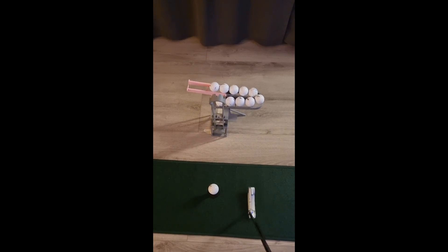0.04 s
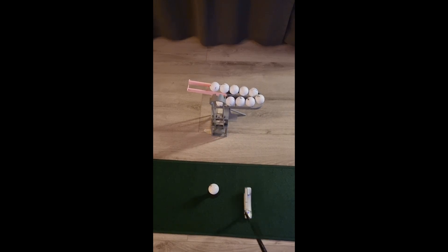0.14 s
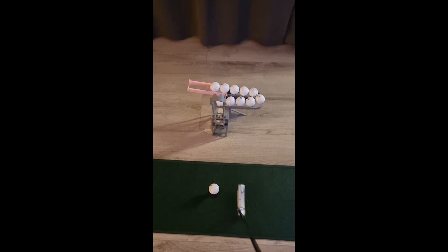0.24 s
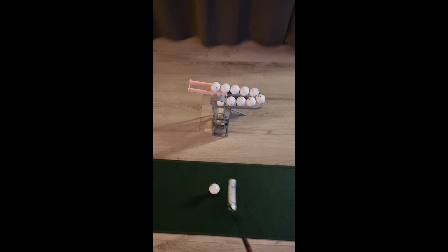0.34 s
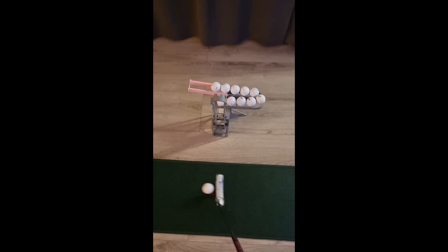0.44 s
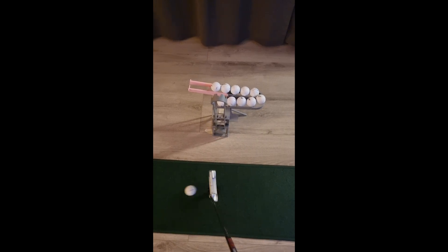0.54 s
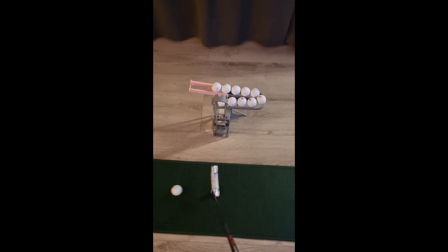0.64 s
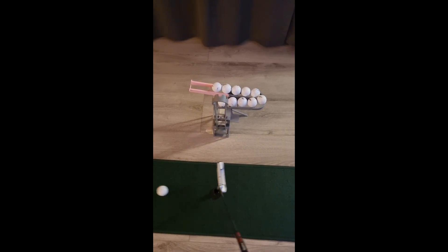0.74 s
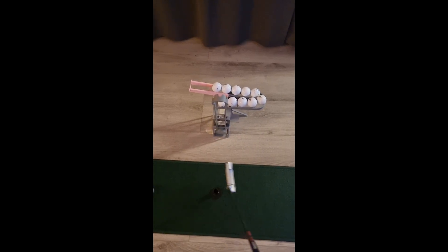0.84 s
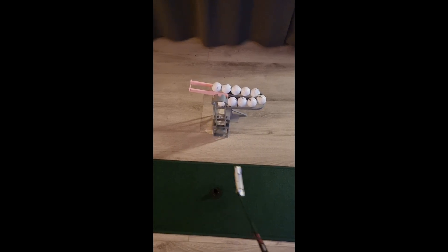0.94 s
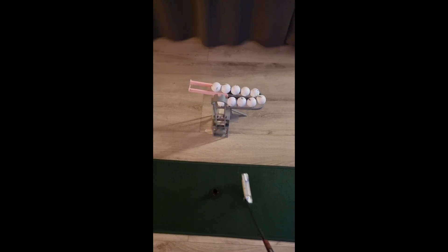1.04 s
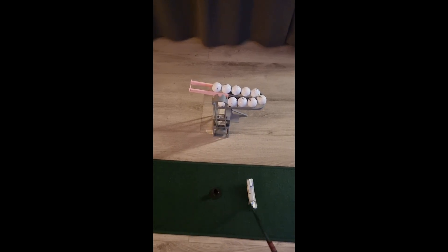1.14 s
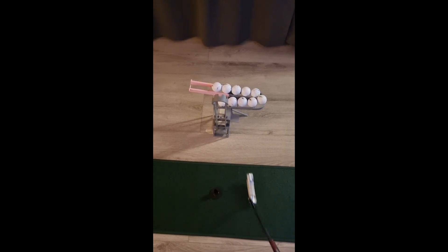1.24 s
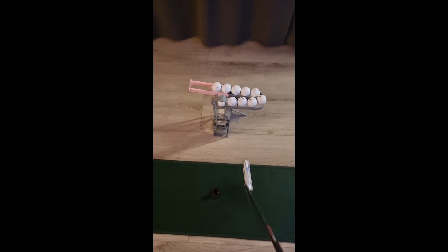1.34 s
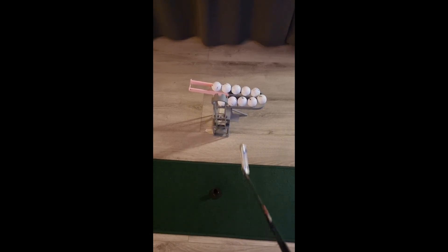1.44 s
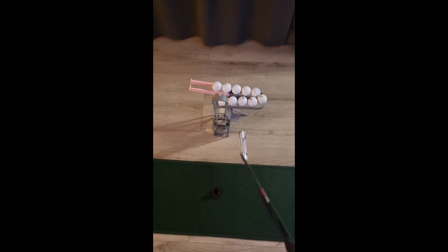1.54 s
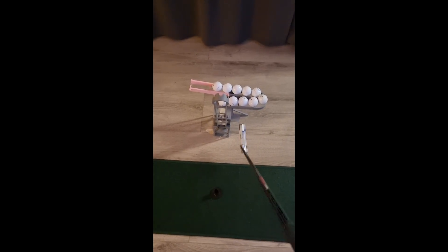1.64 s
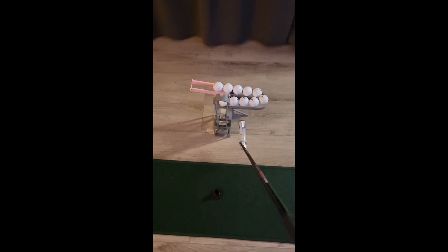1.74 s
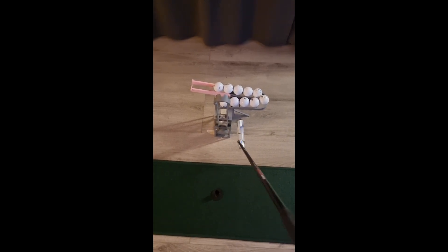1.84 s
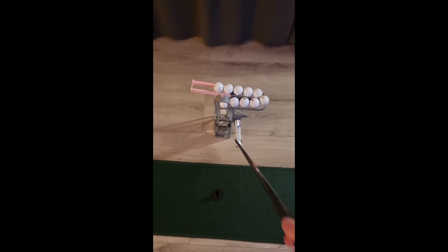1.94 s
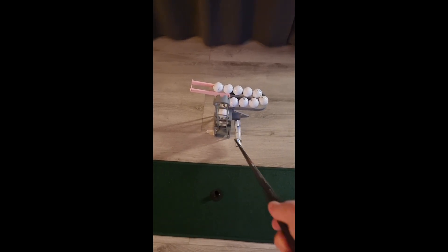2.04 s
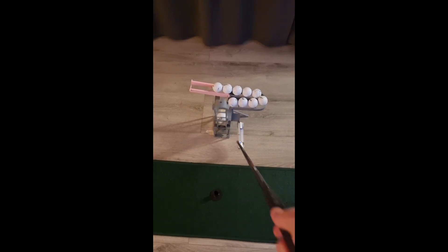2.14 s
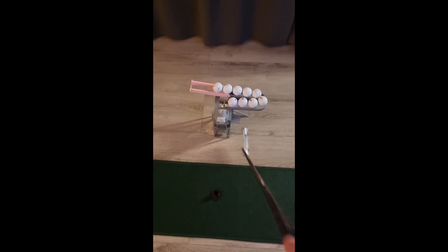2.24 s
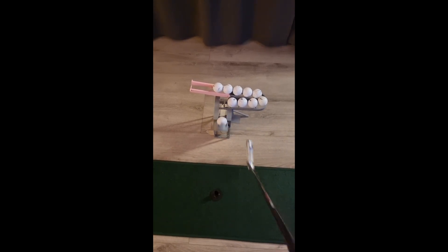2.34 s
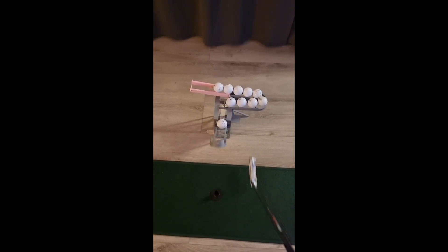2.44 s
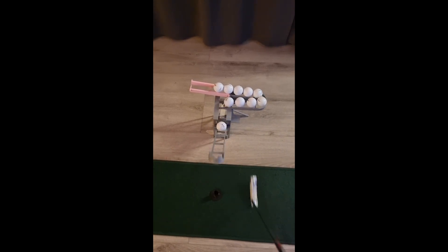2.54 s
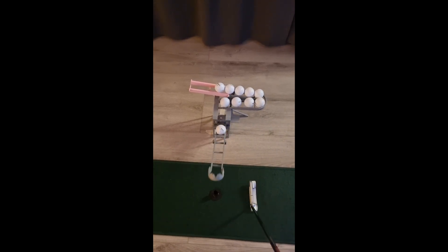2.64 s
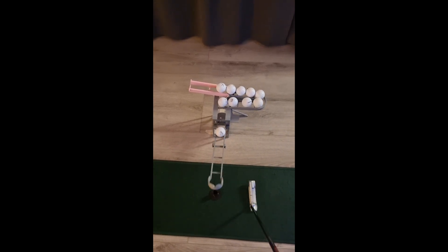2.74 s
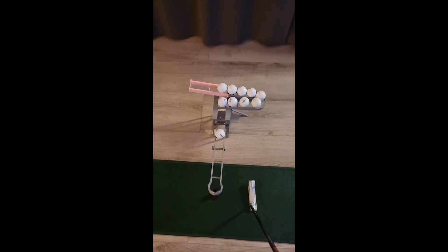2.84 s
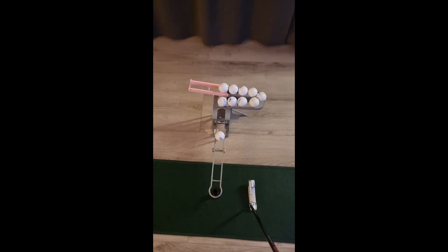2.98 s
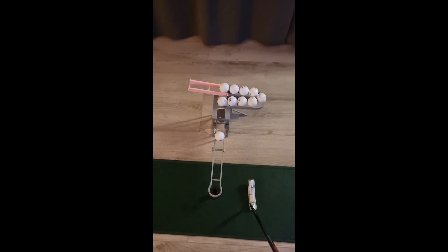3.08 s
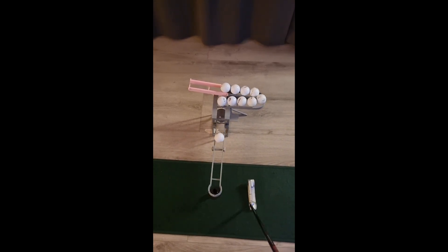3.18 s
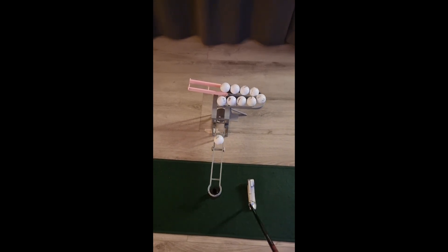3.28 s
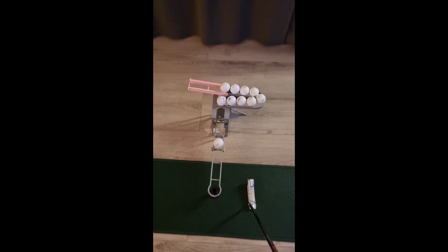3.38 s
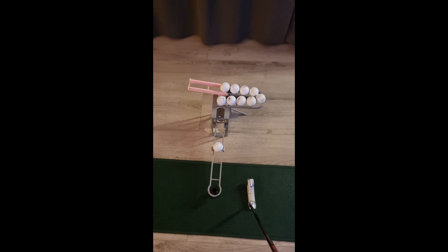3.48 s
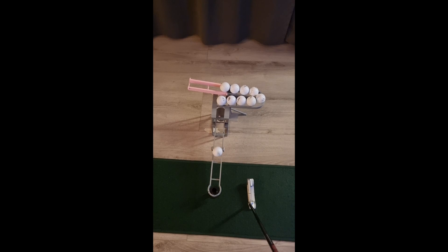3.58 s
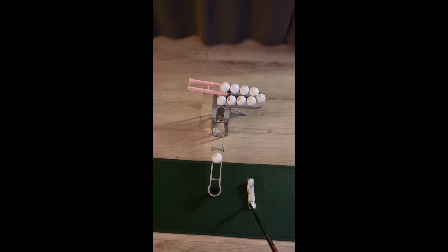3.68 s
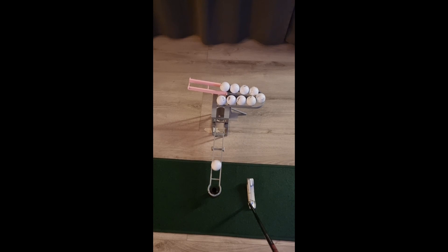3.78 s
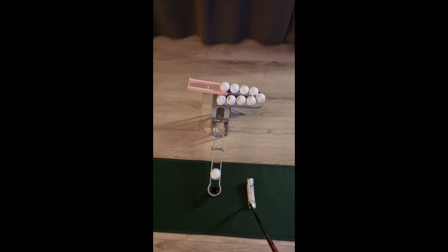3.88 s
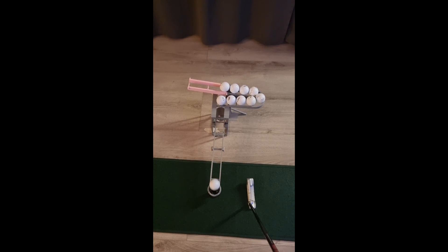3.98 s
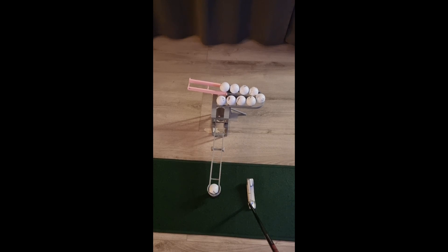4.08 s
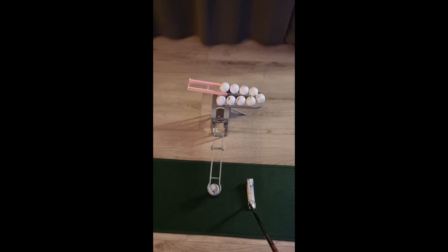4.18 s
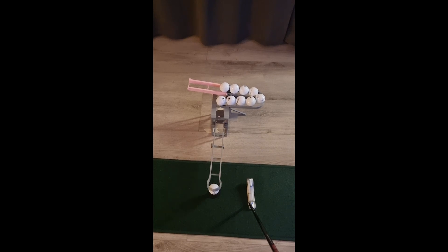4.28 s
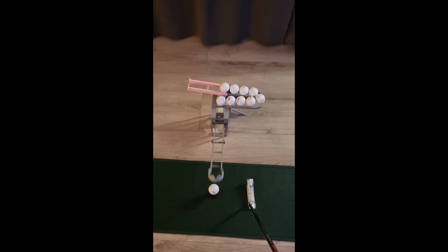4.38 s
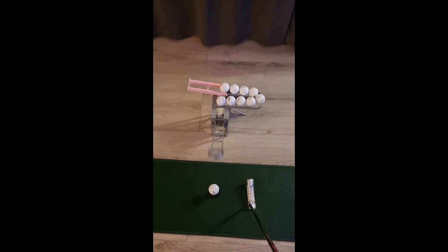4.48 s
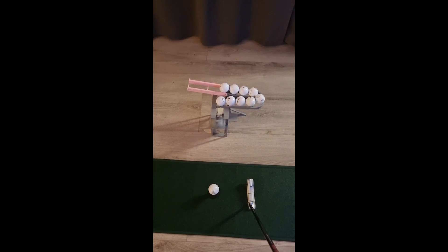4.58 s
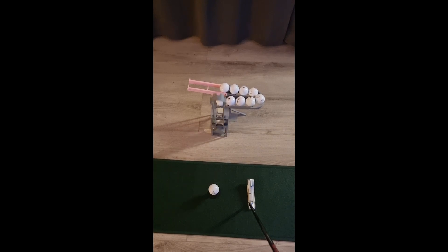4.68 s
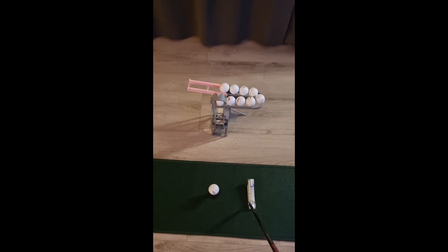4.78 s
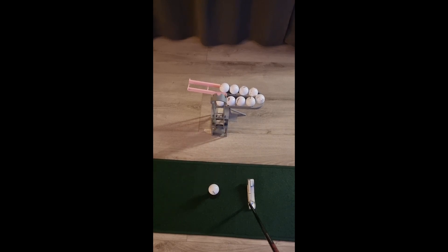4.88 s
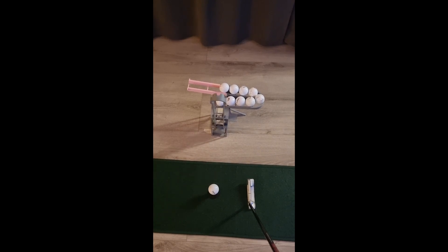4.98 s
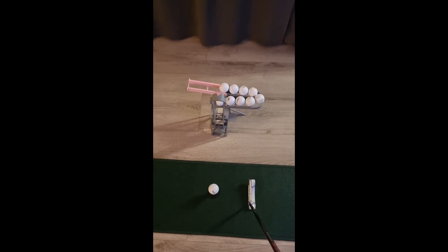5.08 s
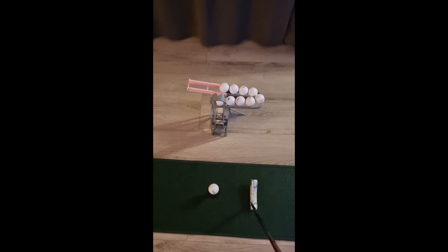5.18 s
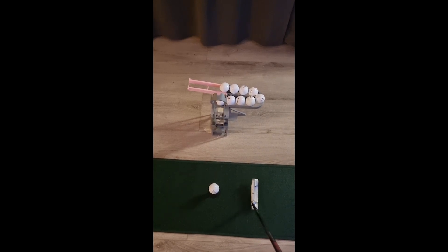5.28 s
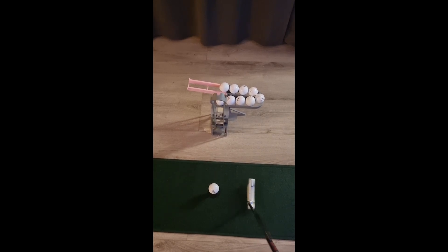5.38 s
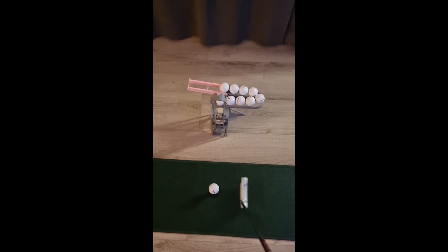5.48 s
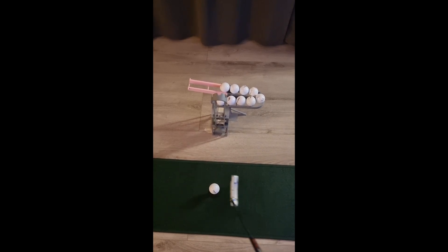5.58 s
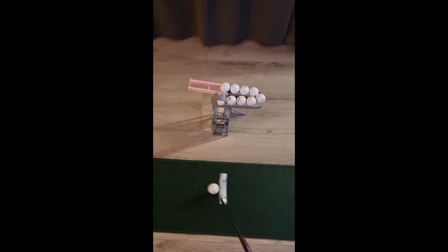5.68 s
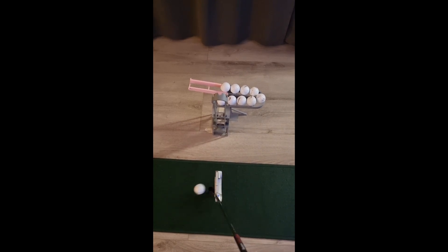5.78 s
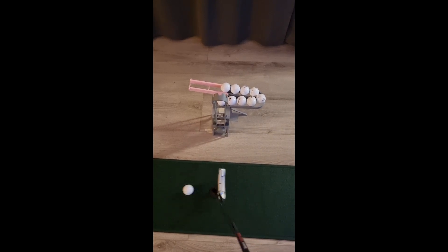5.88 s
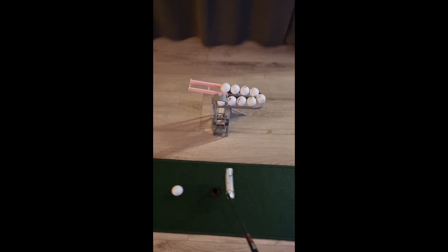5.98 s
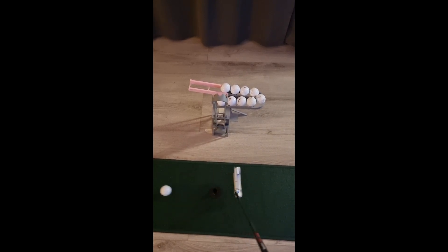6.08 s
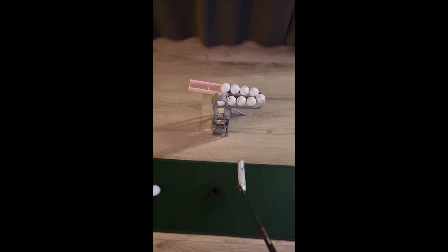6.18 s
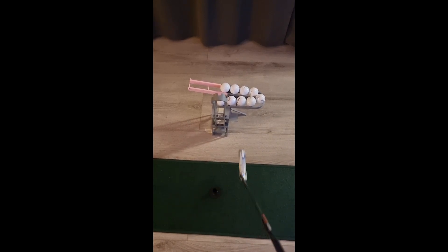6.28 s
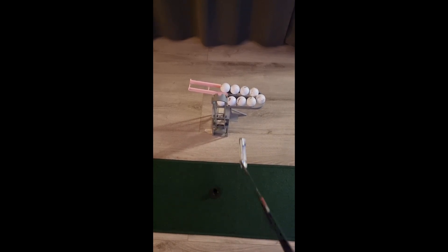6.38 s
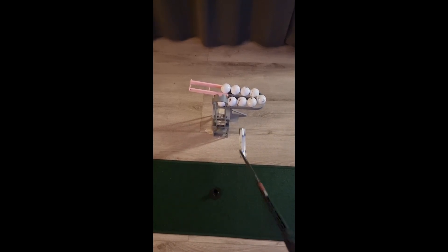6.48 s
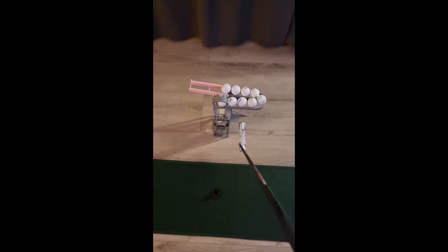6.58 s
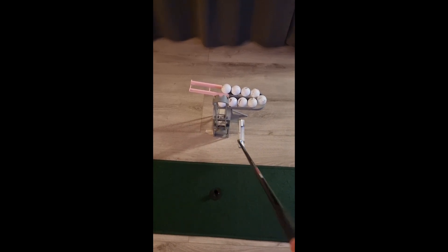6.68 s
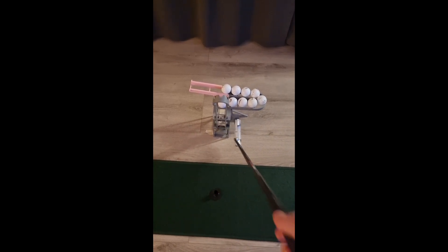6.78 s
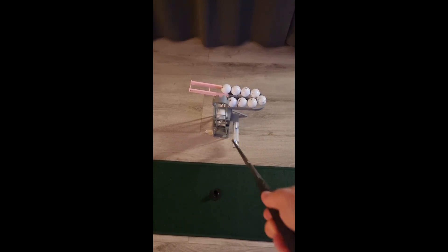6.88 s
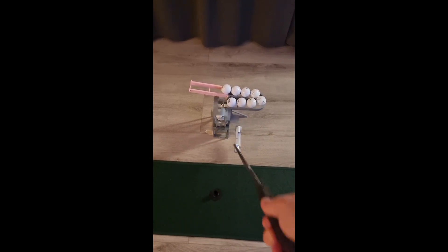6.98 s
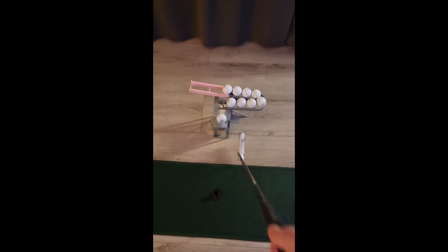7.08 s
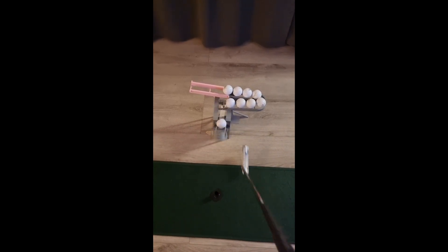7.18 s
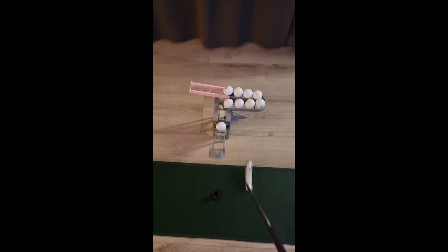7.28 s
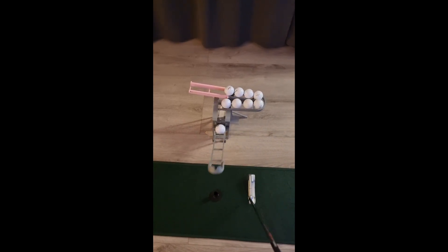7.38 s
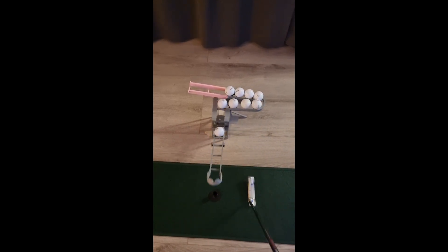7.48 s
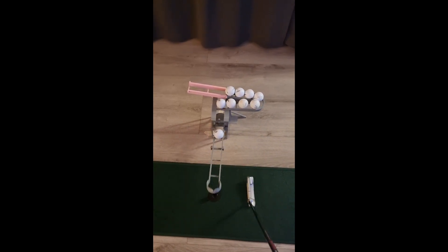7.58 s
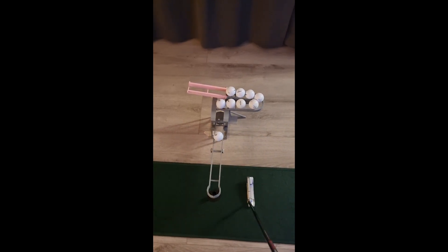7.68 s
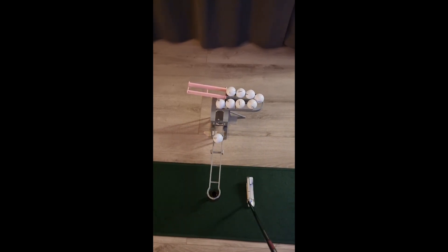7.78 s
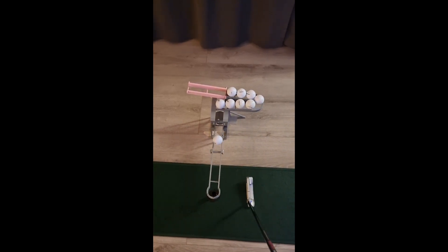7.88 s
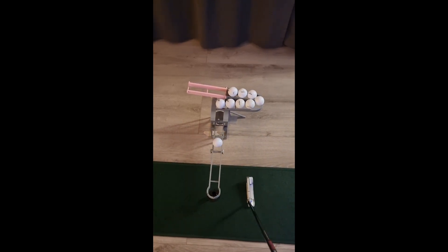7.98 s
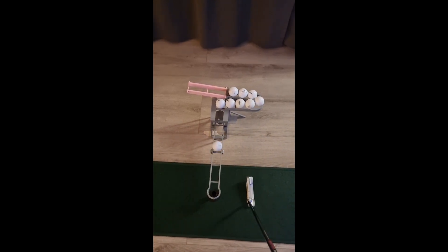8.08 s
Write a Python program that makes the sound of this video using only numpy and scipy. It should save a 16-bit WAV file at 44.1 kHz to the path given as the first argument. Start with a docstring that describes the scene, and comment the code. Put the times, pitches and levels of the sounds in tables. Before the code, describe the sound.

A light putt and a hollow thump on a matted wooden floor open the scene, heard from close by in a small room. A plastic golf ball dispenser clicks, squeaks faintly and drops a ball with a sharp clack. Its arm lands, the ball rolls and rattles off, and the arm snaps back. After another putt and thump, the dispenser clacks again, its arm lowers and the waiting balls click quietly together.

```python
"""Two putts and a ball dispenser

A putter tocks against a ball, which lands on a mat and sets the low modes of a wooden floor booming.
After each putt the putter taps a dispenser's pedal and a ball drops in the plastic housing. The first
time, a rail arm swings down, a ball rolls along it and the arm clatters back up; the second time, the
arm swings down and the waiting balls shuffle. Impacts excite damped modes, rubbing and rolling are
trains of tiny impacts, and a small, fairly live room reverberates over the murmur of its air."""
import sys
import numpy as np
from scipy import signal
from scipy.fft import rfft, irfft
from scipy.io import wavfile
from scipy.ndimage import uniform_filter1d

SR = 44100
rng = np.random.default_rng(int(sys.argv[2]) if len(sys.argv) > 2 else 0)


def wav_out(sig):
    """Save sig, one row per channel (or a flat mono array), as 16-bit PCM at SR to the path in sys.argv[1]."""
    wavfile.write(sys.argv[1], SR, np.round(np.clip(np.atleast_2d(sig).T, -1, 1) * 32767).astype(np.int16))


N = 358533

# putter on ball; an off-centre stroke rings more: t/s, level/dB, ring/dB
PUTTS = [(.486, -39, 9.5), (5.7719, -37, -2)]
# putted ball on the mat: t/s, level/dB, hop time/s, loss per hop/dB
BALL_LANDINGS = [(.621, -25, .112, 8), (5.908, -24.5, .106, 12)]
# putter on pedal: t/s, level/dB
PEDAL_TAPS = [(1.9621, -34), (6.8391, -28)]
# pivot squeaks: t/s, duration/s, start f/Hz, end f/Hz, level/dB
SQUEAKS = [(2.022, 0.076, 5600, 5230, -63.5), (2.213, 0.072, 5580, 5397, -52),
           (6.903, 0.041, 6600, 6660, -52.5), (6.933, 0.023, 6000, 5070, -49)]
# tipping rocker on housing: t/s, level/dB, treble/dB, bass/dB
ROCKER_KNOCKS = [(2.088, -38, -22.5, 14.5), (2.130, -38, -6, 14), (2.1514, -32, -4.5, 8.5),
                 (2.192, -38.5, -4, 15), (2.279, -35.5, -1.5, 2), (6.952, -35.5, -12, 8),
                 (6.961, -32, -13, 8.5), (6.974, -36, 9, 9.5), (7.009, -32, -1, 14)]
# released ball in the housing: t/s, level/dB, lead of the graze/s, first bounce time/s
BALL_DROPS = [(2.2686, -21.5, .0186, .042), (6.994, -20, .0118, .049)]
# the rail unfolds, takes the ball and folds up: t/s, level/dB, treble/dB, bass/dB, chatter T60/s
RAIL_CLACKS = [(2.4834, -41.5, -8.5, -5.5, .055), (3.085, -38.5, -6, -14, 0.027),
               (4.1205, -30, -16, 7, .03), (4.124, -26.5, 0.5, 1, 0.041), (4.4497, -44.5, -11, 1, .045),
               (4.7499, -35.5, 5, 1.5, .04), (4.758, -26.5, 12, -1.5, .075), (4.765, -28, 5.5, -3.5, .025),
               (7.229, -38.5, -5.5, 6.5, .05), (7.243, -38.5, 0.5, 9.5, .05),
               (7.2947, -39.5, -7.5, -1, 0.029)]
# the rail arm falls to the mat: swing t/s, rumble level/dB, landing t/s, landing level/dB
ARM_DROPS = [(2.48, -56, 2.625, -29), (7.25, -49.5, 7.442, -37.5)]
# waiting balls slide forward: t/s, duration/s, level/dB
QUEUE_SHUFFLES = [(2.73, 0.12, -58.5), (3.01, .24, -67.5), (7.6, 0.076, -56), (7.76, 0.32, -67.5)]
# waiting balls collide: t/s, level/dB, treble/dB
QUEUE_CLICKS = [(2.7949, -59, -25), (2.852, -47, -20), (2.8885, -50.5, -29), (3.045, -53.5, -28),
                (3.184, -57, -1), (3.197, -53.5, 23), (7.593, -49, -17), (7.685, -50.5, -15),
                (7.856, -51.5, -5), (7.963, -57.5, -6), (7.976, -58, 0)]

# normal modes of each struck object: f/Hz, level/dB, T60/s
PUTTER_MODES = [(540, -8, .05), (720, -10, .04), (830, -9, .04), (1560, -12, .03), (1870, -7, .03),
                (2540, -11, .04), (3150, -13, .035), (4100, -16, .05), (6400, -27, .05)]
BOARD_MODES = [(71, -11, .32), (96, -13, .22), (120, -8, .22), (148, -1, .33), (186, 1, .34),
               (214, -7, .22), (250, -8, .22), (296, 0, .2), (318, 2, .25), (365, -7, .2), (455, -10, .17),
               (530, -13, .18), (720, -4, .07), (850, 2, .06)]
SMALL_METAL_MODES = [(2550, -8, .15), (2900, -12, .1), (4050, -13, .08), (4800, -2, .15), (7600, -7, .06)]
PEDAL_MODES = [(790, -11, 0.21), (843, -12.5, 0.23), (2175, -11.5, 0.15), (3050, -5.5, 0.064),
               (3700, -2.5, 0.072), (3950, -3, 0.064), (6140, -12.5, 0.056), (9700, -8.5, 0.036)]
HOUSING_MODES = [(790, -18, .1), (2760, -21, .1), (2930, -14, .04), (3045, -9, .07), (3140, -11, .05),
                 (3250, -10, .055), (3420, -12, .04), (3760, -12, .05), (4120, -15, .04), (6320, -20, .05),
                 (6950, -20, .04)]
RAIL_MODES = [(900, -25, .1), (1405, -25, .12), (1879, -22, .15), (2130, -16, .1), (2288, -14, .17),
              (2345, -15, .08), (2398, -13, .13), (2450, -17, .06), (3200, -19, .06), (3480, -15, .07),
              (5300, -23, .07), (7180, -25, .06), (9450, -27, .08)]
BALL_MODES = [(1400, -16, .04), (2300, -16, .05), (3050, -15, .05), (3700, -9, .1), (4150, -13, .05),
              (5000, -17, .09), (9600, -26, .1)]
# spectral envelopes of the dense, short-lived modes: f/Hz, level/dB
PUTTER_BODY = [(100, -14), (300, -4.5), (700, 6.5), (1300, -2), (1900, -6.5), (2900, -15.5), (3600, -12.5),
               (4200, -9), (6000, -26.5), (9000, -36.5), (16000, -37.5)]
PLASTIC_BODY = [(40, -13), (80, -1.5), (150, 1), (300, -5), (480, -10.5), (800, 2.5), (1100, -5),
                (2400, -4.5), (3300, 0.5), (4800, -4), (7000, -9.5), (8500, -12.5), (11000, -17.5),
                (14000, -13), (16000, -16.5)]
RAIL_BODY = [(40, -14.5), (90, 0), (150, 6.5), (220, 0), (310, 2), (480, -4.5), (850, 2.5), (1900, -1),
             (2350, 6.5), (2750, -6), (3400, 1), (5000, -6), (8000, -14), (12300, -17.5), (13200, -7.5),
             (14200, -20), (16000, -17.5)]
# responses of rubbed plastic, the floor and the rail under a rolling ball: f/Hz, gain/dB
RUB_RESPONSE = [(100, -6.5), (550, -1.5), (800, 11.5), (1000, 4), (1600, 2.5), (2200, 3), (2700, -10.5),
                (3200, 0), (3900, -9), (4700, -12.5), (6200, -20), (8000, -25), (16000, -30.5)]
FLOOR_RESPONSE = [(30, -20), (60, -0.5), (85, 11.5), (115, -14), (152, 6), (200, -11), (290, 1),
                  (400, -17.5), (800, -14), (2000, -104)]
ROLL_RESPONSE = [(200, -12.5), (550, -1.5), (850, 12.5), (1100, -0.5), (1400, 3), (1950, -9), (2350, 4.5),
                 (2750, -14), (3500, -8.5), (4300, -18), (5000, -17), (7800, -34.5), (9400, -28),
                 (11000, -40.5)]
# background noise of the air: f/Hz, relative spectral density/dB
AIR_SPECTRUM = [(25, -10), (45, -6), (75, -8), (115, -12.5), (160, -6.5), (260, -3.5), (400, -10.5),
                (560, -15), (1160, -25), (2350, -29), (3500, -42), (6000, -51.5), (9000, -58), (14000, -47)]
# reverberation time of the room: f/Hz, T60/s
ROOM_T60 = [(100, .5), (300, 0.4), (1000, 0.34), (2500, 0.33), (5000, 0.22), (9000, 0.19), (15000, 0.14)]
# left-right coherence of the air and of the other sounds: f/Hz, coherence/1
AIR_COHERENCE = [(30, 0.48), (180, 1), (550, 0.93), (1650, 0.86), (5000, 0.052), (15000, .2)]
COHERENCE = [(100, 1), (300, 1), (600, 0.29), (1100, 0.33), (3000, 0.24), (15000, 0.067)]

RESTITUTION = 0.78  # of a ball on plastic


def amp(db):
    return 10 ** (np.asarray(db) / 20)


def unit_rms(x):
    return x / np.sqrt(np.mean(x ** 2) + 1e-20)


def curve_at(points, hz):
    """Interpolation on a logarithmic frequency axis."""
    f, value = np.transpose(points)
    return np.interp(np.log(hz + 1), np.log(f + 1), value)


def add(mix, s, sound):
    """Superposition of a sound that starts at time s."""
    part = mix[:, round(s * SR):][:, :sound.shape[-1]]
    part += sound[..., :part.shape[1]]


def filtered(x, *responses, size=4096):
    """Minimum-phase filtering: responses in cascade add in dB."""
    hz = abs(np.fft.fftfreq(size, 1 / SR))
    log_gain = np.log(amp(sum(curve_at(response, hz) for response in responses)))
    taps = np.fft.ifft(np.exp(np.conj(signal.hilbert(log_gain)))).real
    return signal.oaconvolve(x, taps[None], axes=1)[:, :x.shape[1]]


def cohered(x, coherence):
    """Partial coherence: two nearby points in a sound field agree best at long wavelengths."""
    spectra, hz = rfft(x), np.fft.rfftfreq(x.shape[1], 1 / SR)
    angle = np.arccos(np.clip(curve_at(coherence, hz), -1, 1)) / 2
    mid, side = spectra[0] * np.cos(angle), spectra[1] * np.sin(angle)
    return irfft([mid + side, mid - side], x.shape[1])


def impacts(times, levels_db, body, modes, treble_db, bass_db, chatter_t60, ring_db,
            crack_db, crack_t60, rise_s, size=16384):
    """Impulse response: dense modes merge into a crack and a chatter, while isolated modes ring."""
    out, t = np.zeros((2, N)), np.arange(size) / SR
    attack = round(.005 * SR)  # a blow's level is its rms over this span
    onset = 1 - np.exp(-t / rise_s)
    events = np.broadcast(times, levels_db, treble_db, bass_db, chatter_t60, ring_db)
    for s, db, treble, bass, chatter, ring in events:
        envelope = (amp(-60 * t / chatter) + amp(crack_db - 60 * t / crack_t60)) * onset
        dense = filtered(cohered(rng.standard_normal((2, size)), COHERENCE) * envelope, body)
        dense /= np.sqrt(np.mean(dense[:, :attack] ** 2))
        detune = 1 + .003 * rng.standard_normal(len(modes))  # the point of contact varies
        rings = sum(amp(level - 60 * t / t60) * np.sin(2 * np.pi * (hz * shift * t + rng.random((2, 1))))
                    for (hz, level, t60), shift in zip(modes, detune))
        ring_gain = amp(ring - .85 * bass)  # heavy blows thud, light ones ring
        treble_shelf = [(3500, 0), (12000, treble)]
        bass_hump = [(120, 0.66 * bass), (280, bass), (1500, 0)]
        hit = filtered(dense + ring_gain * rings * onset, treble_shelf, bass_hump)
        add(out, s, amp(db) * hit / np.sqrt(np.mean(hit[:, :attack] ** 2)))
    return out


def contact_noise(gain, response, per_s, spread_db, lurch_db, lurch_hz=22):
    """Shot noise: tiny random impacts drive a body while the contact pressure slowly fluctuates."""
    contacts = rng.random(N) < per_s / SR
    strength = amp(spread_db * np.minimum(rng.exponential(1, N), 4))
    slow_band = np.fft.rfftfreq(N, 1 / SR) < lurch_hz
    lurch = unit_rms(irfft(rfft(rng.standard_normal(N)) * slow_band, N))
    force = contacts * strength * amp(lurch_db * np.tanh(lurch)) * rng.standard_normal((2, N))
    return gain * unit_rms(filtered(cohered(force, COHERENCE), response))


def sustained(rows, attack_s, release_t60):
    """Linear rise, hold and exponential decay for rows of t/s, duration/s, level/dB."""
    t = np.arange(N) / SR
    return sum(np.clip((t - s) / attack_s, 0, 1)
               * amp(db - 60 * np.maximum(t - s - length, 0) / release_t60) for s, length, db in rows)


def bounces(s, gap_s, restitution, count):
    """Inelastic bouncing: flight times shrink geometrically. Gives each contact's index and time."""
    k = np.arange(count)[:, None]
    flight = restitution ** k
    return k, s + gap_s * (np.cumsum(flight, axis=0) - flight)


def room(x, wet_db, build_s=0.002, reflections_per_s=4000, size=32768):
    """Reverberation: sparse reflections build up quickly and are absorbed sooner in the treble."""
    signs = rng.choice([-1., 1.], (2, size))
    reflections = cohered(signs * (rng.random((2, size)) < reflections_per_s / SR), COHERENCE)
    hz, t, spectra = signal.stft(reflections, SR, nperseg=256)
    decay = amp(-60 * t / curve_at(ROOM_T60, hz)[:, None])
    tail = signal.istft(spectra * decay, SR)[1][:, :size]
    tail *= 1 - np.exp(-(np.arange(size) / SR / build_s) ** 2)
    tail /= np.linalg.norm(tail, axis=1, keepdims=True)
    return x + amp(wet_db) * signal.fftconvolve(x, tail, axes=1)[:, :N]


def placed(x, left_db, left_lead_ms):
    """Localisation by differences of level and arrival time between left and right."""
    lead = np.exp(2j * np.pi * np.fft.rfftfreq(N, 1 / SR) * left_lead_ms / 1000)
    return np.array([irfft(rfft(x[0]) * lead, N), x[1]]) * amp([[left_db / 2], [-left_db / 2]])


def air(level_db=-62):
    """Stationary noise: the low murmur of the room's air."""
    noise = cohered(rng.standard_normal((2, N)), AIR_COHERENCE)
    return amp(level_db) * unit_rms(filtered(noise, AIR_SPECTRUM))


def putter():
    """Heavy damping: the modes struck by putter on ball die quickly, in a woody tock."""
    s, db, ring_db = np.transpose(PUTTS)
    return impacts(s, db, PUTTER_BODY, PUTTER_MODES, treble_db=1, bass_db=1.5, chatter_t60=.021,
                   ring_db=ring_db, crack_db=-3.5, crack_t60=.015, rise_s=.0011)


def board_booms(times, levels_db, corners_hz, rise_s=0.0013, size=32768):
    """Cushioned impact: the mat low-passes the force, so only the low modes of the boards respond."""
    out, t = np.zeros((2, N)), np.arange(size) / SR
    attack = round(.025 * SR)
    onset = 1 - np.exp(-t / rise_s)
    for s, db, corner_hz in np.broadcast(times, levels_db, corners_hz):
        boom = np.zeros(size)
        for k, (hz, level, t60) in enumerate(BOARD_MODES):
            excitation = (-1) ** (k // 2) / (1 + (hz / corner_hz) ** 4)
            boom += excitation * amp(level - 60 * t / t60) * np.sin(2 * np.pi * hz * t) * onset
        add(out, s, amp(db) * boom / np.sqrt(np.mean(boom[:attack] ** 2)))
    # boards radiate poorly below their lowest mode
    return signal.sosfilt(signal.butter(2, 48, "high", fs=SR, output="sos"), out)


def ball_landings(corner_hz=350, softening=0.5):
    """A softer blow excites fewer modes: the ball booms on the floor, then hops once, more dully."""
    s, db, hop_s, loss_db = np.transpose(BALL_LANDINGS)
    hop = np.arange(2)[:, None]
    return board_booms(s + hop_s * hop, db - loss_db * hop, corner_hz * softening ** hop)


def cover_pat(level_db=-51.5):
    """Contact sound: the ball's cover pats the mat faintly as it first lands."""
    times = [landing[0] for landing in BALL_LANDINGS]
    return impacts(times, level_db, PUTTER_BODY, PUTTER_MODES, treble_db=-20.5, bass_db=18,
                   chatter_t60=.04, ring_db=-1, crack_db=-4, crack_t60=.015, rise_s=.002)


def far_tick(s=1.055, level_db=-70):
    """Free vibration after one small, distant impact."""
    return impacts(s, level_db, PLASTIC_BODY, SMALL_METAL_MODES, treble_db=-5, bass_db=0,
                   chatter_t60=.055, ring_db=0, crack_db=-6, crack_t60=.01, rise_s=.0015)


def pedal(linkage_lag_s=.035, linkage_db=-40.5, rub_db=-50.5):
    """Impact, then sliding friction: a tap, a rattle of the linkage and a rub until the ball drops."""
    s, db = np.transpose(PEDAL_TAPS)
    tap = impacts(s, db, PLASTIC_BODY, PEDAL_MODES, treble_db=9.5, bass_db=-12,
                  chatter_t60=.021, ring_db=-5.5, crack_db=-5, crack_t60=.01, rise_s=.004)
    linkage = impacts(s + linkage_lag_s, linkage_db, PLASTIC_BODY, PEDAL_MODES, treble_db=-10.5,
                      bass_db=-6.5, chatter_t60=.13, ring_db=-1.5,
                      crack_db=-3.5, crack_t60=.012, rise_s=.004)
    strokes = [(tap_s, drop[0] - tap_s, rub_db) for tap_s, drop in zip(s, BALL_DROPS)]
    rub_gain = sustained(strokes, attack_s=.02, release_t60=.45)
    return tap + linkage + contact_noise(rub_gain, RUB_RESPONSE, per_s=2800, spread_db=.2, lurch_db=1)


def pivot_squeaks(waver=0.04):
    """Stick-slip oscillation: the pivot gives short whistles of unsteady pitch."""
    out = np.zeros((2, N))
    for s, length, start_hz, end_hz, db in SQUEAKS:
        count = int(length * SR)
        wobble = unit_rms(uniform_filter1d(rng.standard_normal(SR), size=40))[:count]
        hz = np.linspace(start_hz, end_hz, count) * (1 + waver * wobble)
        whistle = np.sin(2 * np.pi * np.cumsum(hz) / SR) * np.hanning(count)
        add(out, s, amp(db) * unit_rms(whistle))
    return out


def rocker():
    """Damped shell vibration: the tipping rocker knocks dully on the housing."""
    s, db, treble_db, bass_db = np.transpose(ROCKER_KNOCKS)
    return impacts(s, db, PLASTIC_BODY, HOUSING_MODES, treble_db, bass_db,
                   chatter_t60=.046, ring_db=-4, crack_db=1.5, crack_t60=.006, rise_s=.0018)


def dropping_ball():
    """Inelastic collision: a ball grazes the rocker, clacks in the housing and rebounds twice, duller."""
    s, db, lead_s, bounce_s = np.transpose(BALL_DROPS)
    graze = impacts(s - lead_s, db - 7, PLASTIC_BODY, HOUSING_MODES, treble_db=0, bass_db=-.5,
                    chatter_t60=.024, ring_db=1, crack_db=2, crack_t60=.0049, rise_s=.0024)
    k, times = bounces(s, bounce_s, RESTITUTION, count=3)
    loss = k ** 0.38  # in units of the first rebound's loss
    clacks = impacts(times, db - 9.5 * loss, PLASTIC_BODY, HOUSING_MODES, treble_db=-1.5 - 6 * loss,
                     bass_db=-10, chatter_t60=.011, ring_db=0, crack_db=2, crack_t60=.0044, rise_s=.0018)
    return graze + clacks


def floor_rumble(speed, shuffle, swing_s=.051, full_speed_db=-51.5):
    """Structure-borne sound: the floor carries the arm's swing, the queue's shuffle and the roll."""
    swing = sustained([(s, swing_s, db) for s, db, _, _ in ARM_DROPS], attack_s=.014, release_t60=1)
    gain = swing + amp(9.5) * shuffle + amp(full_speed_db) * speed ** .45
    return contact_noise(gain, FLOOR_RESPONSE, per_s=800, spread_db=2, lurch_db=1.5)


def rail_arm(shiver_db=-64.5):
    """Impulsive excitation of the rail's modes: the arm clacks at its joints and shivers as it lands."""
    s, db, treble_db, bass_db, chatter_t60 = np.transpose(RAIL_CLACKS)
    clacks = impacts(s, db, RAIL_BODY, RAIL_MODES, treble_db, bass_db, chatter_t60,
                     ring_db=-1.5, crack_db=-10, crack_t60=.0069, rise_s=.0024)
    landing_s = [drop[2] for drop in ARM_DROPS]
    shiver = impacts(landing_s, shiver_db, RAIL_BODY, RAIL_MODES, treble_db=7.5, bass_db=7,
                     chatter_t60=.08, ring_db=-8, crack_db=-10.5, crack_t60=.01, rise_s=.004)
    return clacks + shiver


def arm_landings(corner_hz=92):
    """A very soft impact: the arm meets the mat and excites the lowest modes of the boards."""
    _, _, s, db = np.transpose(ARM_DROPS)
    return board_booms(s, db, corner_hz)


def ball_queue(shuffle):
    """Friction and collision: waiting balls scrape and click; the duller the click, the heavier."""
    s, db, treble_db = np.transpose(QUEUE_CLICKS)
    clicks = impacts(s, db, PLASTIC_BODY, BALL_MODES, treble_db, bass_db=3.5 - .52 * treble_db,
                     chatter_t60=.039, ring_db=6, crack_db=7, crack_t60=.02, rise_s=.0013)
    return clicks + contact_noise(shuffle, RUB_RESPONSE, per_s=900, spread_db=.5, lurch_db=5)


def roll_speed(start_s=3.39, end_s=4.07, stop_s=.04):
    """Uniform acceleration along the rail, then a quick stop; speed runs from 0 to 1."""
    return np.interp(np.arange(N) / SR, [start_s, end_s, end_s + stop_s], [0, 1, 0])


def rolling_ball(speed, full_speed_db=-51.5):
    """Rolling noise: a wobbling ball's dimples patter on the rail, growing as a power of its speed."""
    gain = amp(full_speed_db) * speed ** 1.35
    return contact_noise(gain, ROLL_RESPONSE, per_s=2400, spread_db=1.6, lurch_db=5, lurch_hz=16)


def settling_ball(s=4.1565, gap_s=.056, level_db=-28.5):
    """Energy loss at each bounce: the ball rattles to rest in the ring at the end of the rail."""
    k, times = bounces(s, gap_s, RESTITUTION, count=3)
    return impacts(times, level_db - 11 * k, RAIL_BODY, RAIL_MODES, treble_db=-.5 - 7.5 * k, bass_db=-12,
                   chatter_t60=.063, ring_db=-.5, crack_db=-9, crack_t60=.01, rise_s=.0022)


def scene():
    """Superposition of dispenser, putter, floor and air in one room."""
    speed = roll_speed()
    shuffle = sustained(QUEUE_SHUFFLES, attack_s=.033, release_t60=.32)
    mechanism = (pedal() + rocker() + dropping_ball() + rail_arm() + settling_ball()
                 + ball_queue(shuffle) + rolling_ball(speed) + pivot_squeaks())
    dispenser = room(mechanism, wet_db=-5) + floor_rumble(speed, shuffle)
    putting = room(putter() + cover_pat(), wet_db=-9.5) + room(far_tick(), wet_db=-1)
    floor = room(ball_landings() + arm_landings(), wet_db=-14)
    return (placed(dispenser, left_db=0, left_lead_ms=.32)
            + placed(putting, left_db=-1.5, left_lead_ms=-.37)
            + placed(floor, left_db=-1, left_lead_ms=-.16)
            + placed(air(), left_db=-2.5, left_lead_ms=.25))


def record(dry, cutoff_hz=15900):
    """Band limiting by a steep, linear-phase low-pass filter."""
    taps = signal.firwin(511, cutoff_hz, window=("kaiser", 9), fs=SR)
    return signal.oaconvolve(dry, taps[None], "same")


dry = scene()
out = record(dry)
wav_out(out)
```